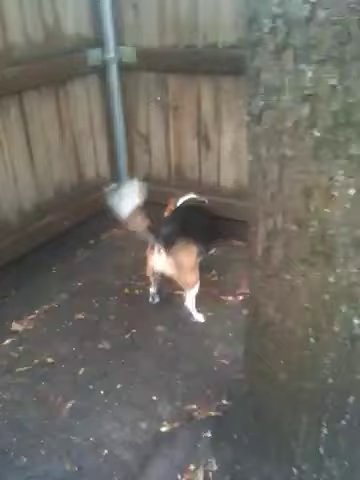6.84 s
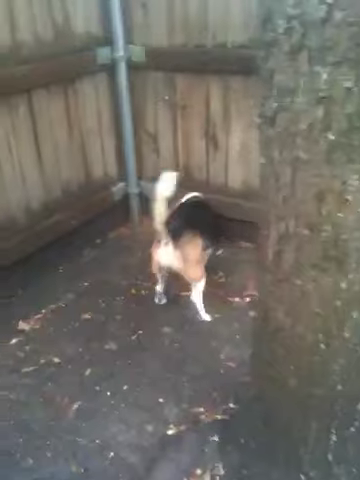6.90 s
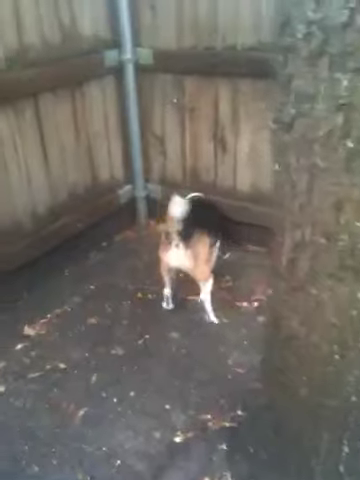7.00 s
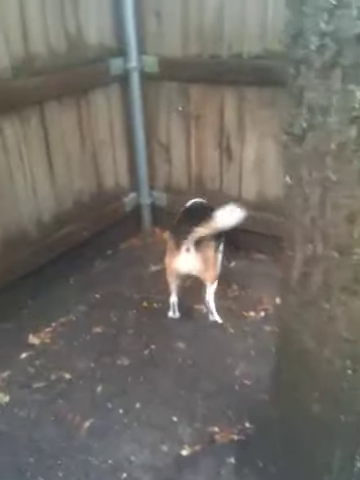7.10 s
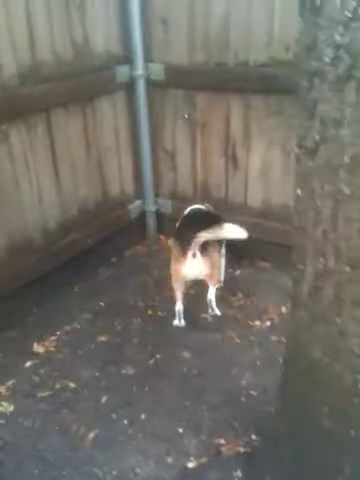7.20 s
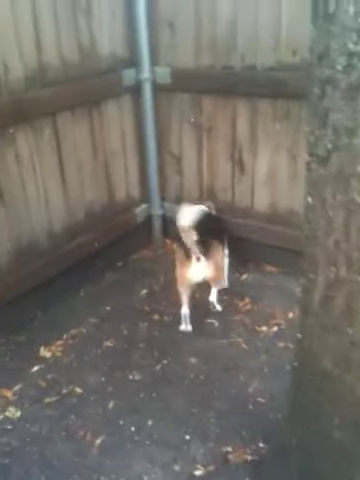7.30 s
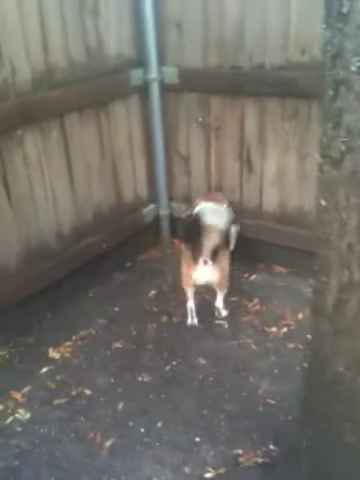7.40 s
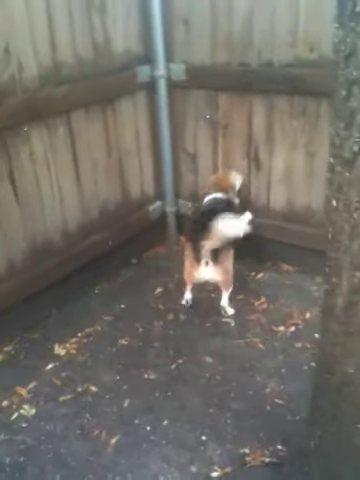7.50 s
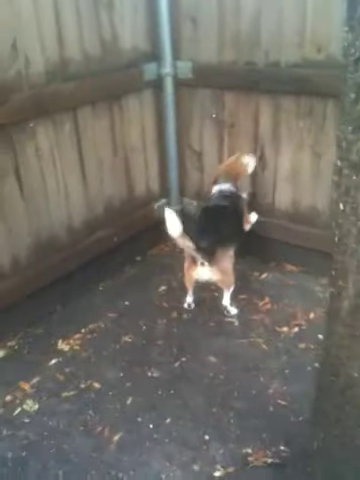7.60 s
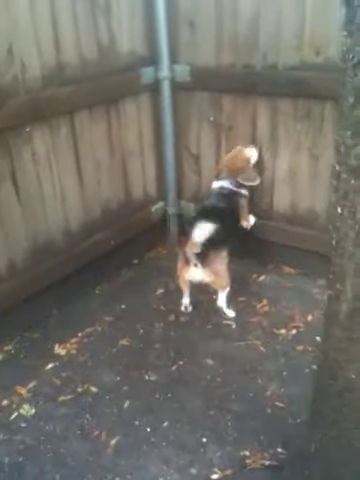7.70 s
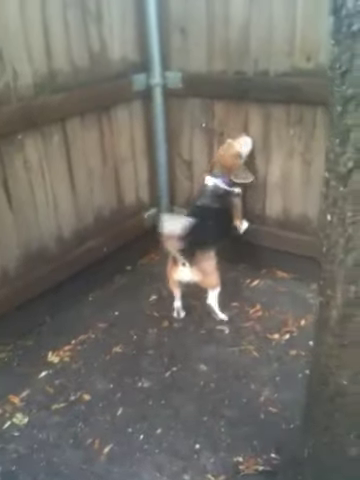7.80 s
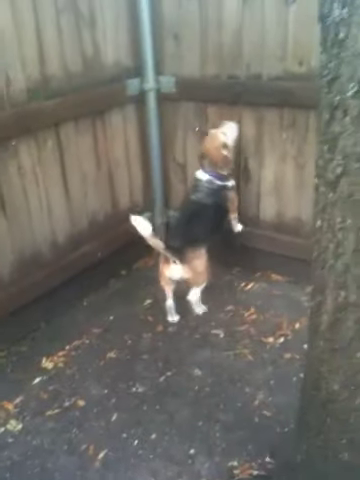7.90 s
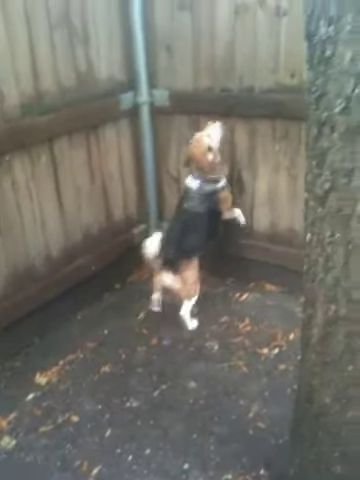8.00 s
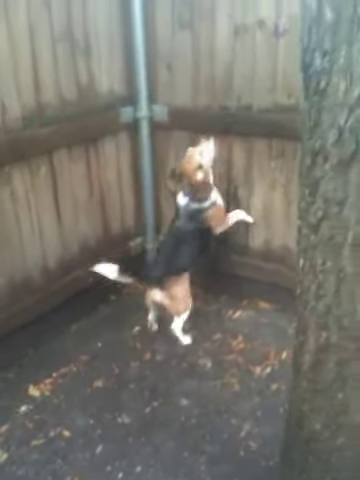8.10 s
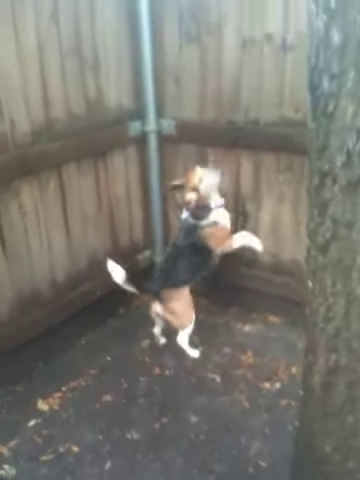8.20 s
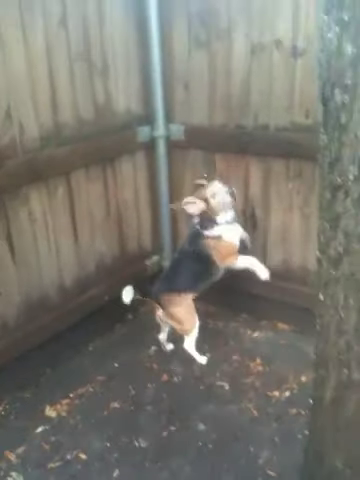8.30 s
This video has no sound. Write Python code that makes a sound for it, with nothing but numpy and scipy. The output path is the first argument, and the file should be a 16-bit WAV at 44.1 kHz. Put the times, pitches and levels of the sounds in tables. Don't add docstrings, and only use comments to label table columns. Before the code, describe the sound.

After a faint distant howl, a nearby dog bays twice with raspy voice and barks twice, paws rustling dry leaves over a soft outdoor hum.

```python
import sys
import numpy as np
from scipy import signal
from scipy.fft import rfft, irfft, next_fast_len
from scipy.io import wavfile
from scipy.ndimage import uniform_filter1d, map_coordinates

SR = 44100
rng = np.random.default_rng(int(sys.argv[2]) if len(sys.argv) > 2 else 0)


def dump(signal):
    limited = np.clip(np.atleast_2d(signal).T, -1, 1)
    pcm = np.round(limited * 32767).astype(np.int16)
    wavfile.write(sys.argv[1], SR, pcm)


def invert_db(x):
    u = np.asarray(x, float) / 20
    return 10 ** u


N = 368235
T = np.arange(N) / SR

# (frequency [Hz], level per Hz [dB])
AIR = [(18, -63), (30, -35), (86, -2.5), (189, -0.5), (233, -9.5), (303, -13), (449, -8.5), (632, -15),
       (1070, -19), (1460, -24), (2120, -27.5), (2900, -27), (6000, -29.5), (14800, -32), (16000, -41)]
AIR_DB = -61.5
# (time [s], level [dB])
LOW_DRONE = [(0.0, -55.5), (0.74, -50.5), (1.05, -57), (1.4, -75.5), (1.9, -63.5), (2.63, -58), (3.05, -66),
             (3.7, -71.5), (4.58, -75.5), (5.14, -65), (5.65, -69.5), (6.23, -63), (7.11, -74), (8.35, -92)]
HIGH_DRONE_DB, SPIN_DOWN_DB, SPIN_DOWN_S = -66.5, 7, 0.4

# (frequency [Hz], time to fall 60 dB [s])
YARD = [(300, 0.19), (800, 0.43), (2000, 0.58), (3600, 0.16), (5000, 0.013), (12000, 0.007)]
NEAR_ECHO_DB = -21.5

# (start [s], length [s], first pitch [Hz], last pitch [Hz], level [dB])
FAR_OPENING = [
    (0.0, .16, 1108, 1098, -53),
    (.08, .15, 1165, 1185, -60),
    (.03, .18, 1020, 1040, -63),
    (.17, .1, 1130, 1000, -60),
]
# (start [s], length [s], first pitch [Hz], last pitch [Hz], level [dB])
FAR_FALL = [
    (.205, .17, 985, 951, -54),
    (.4, .08, 965, 955, -65),
    (.29, .47, 835, 766, -53),
]

# (loudest time [s], build-up [s], rustle [dB], crackle over it [dB], thud over it [dB])
DRAGS = [(5.87, .06, -76.5, -4, 17), (6.043, 0.056, -59, -3, 5), (6.123, 0.029, -48.5, -11, -75),
         (6.176, 0.014, -58, -14, -21), (6.301, 0.1, -46.5, -4, -3), (6.599, 0.0607, -74, 11.5, -15),
         (7.53, .05, -68, 2.5, -13), (7.683, 0.053, -65, 3, -23)]
SETTLE = 0.76
# (time [s], peak level [dB], pitch [Hz], time to fall 60 dB [s])
SNAPS = [(0.152, -47, 6000, 0.023), (0.954, -44.5, 5000, 0.038), (1.1333, -40.5, 4440, 0.092),
         (1.4685, -39.5, 4370, 0.043), (3.302, -53, 8400, 0.03), (3.7933, -51.5, 8390, 0.04),
         (3.9728, -37.5, 7820, 0.025), (3.9843, -28.5, 7430, 0.025), (5.1514, -39.5, 2870, 0.093),
         (5.268, -40, 1500, .04), (8.162, -40, 2490, .03), (6.099, -53.5, 3305, 0.03),
         (6.163, -26.5, 3160, 0.039), (6.1694, -17, 3000, 0.041), (4.126, -18.5, 2300, .02),
         (5.372, -55.5, 9020, .02), (6.543, -46, 2705, 0.031), (7.138, -50, 9620, 0.024),
         (7.2426, -51, 5240, 0.028), (7.264, -51, 7960, 0.032), (7.3154, -46.5, 6080, 0.031),
         (7.5307, -49, 6200, 0.038), (7.6179, -37, 4000, 0.042), (7.666, -41, 6620, 0.03),
         (7.6839, -43, 6750, 0.0305), (7.891, -52, 11430, 0.037), (7.9819, -30.5, 3600, 0.064),
         (8.2755, -48.5, 2670, 0.029)]

# (time [s], peak level [dB], lowest ring [dB], highest ring [dB])
CLINKS = [(6.601, -45.5, -13, -29), (6.8069, -47, -10, -24.5), (6.825, -43, -13, -28),
          (6.925, -39.5, -4, -21), (6.9755, -47.5, -12, -9), (8.09, -43.5, -16.5, -30)]
# (frequency [Hz], level [dB], time to fall 60 dB [s])
TAG_RINGS = [(5780, 13, 0.081), (8400, 10, 0.096), (9730, 8, 0.03), (11670, 16, 0.16)]

# (middle [s], length [s], level [dB], brightness [dB],
# resonance [Hz])
PANTS = [(0.347, 0.045, -61.5, 1.5, 2120), (0.892, 0.069, -72, 7, 3040), (1.47, 0.047, -69, -0.5, 936),
         (2.144, 0.038, -48.5, -3.5, 3450), (2.25, 0.043, -64.5, -6, 3400), (2.45, 0.044, -60.5, -5, 3130),
         (3.457, 0.024, -61, 1.5, 870), (3.964, 0.067, -65.5, 6.5, 981), (5.3, 0.041, -54, -5.5, 783),
         (5.472, 0.051, -69.5, 1.5, 6440), (5.725, 0.035, -60, -5, 2920), (5.974, 0.055, -45, -32, 2502),
         (6.344, 0.063, -39.5, -7.5, 2693), (6.697, 0.029, -51.5, 2, 1250), (7.0, 0.029, -68, 0, 948),
         (7.2, 0.052, -74.5, 1, 800), (7.37, 0.054, -72.5, 1, 1820), (3.666, 0.048, -71, 0, 8180),
         (7.79, 0.012, -63.5, 1.5, 1220), (7.947, 0.022, -64.5, -20.5, 1765), (7.99, 0.014, -55, 3, 613),
         (8.192, 0.031, -54.5, 3.5, 1130), (8.35, 0.01, -43.5, -5, 492)]
# (frequency [Hz], level per Hz [dB])
BREATH = [(88, -50.5), (150, -11), (249, -4), (474, -15), (901, -1.5), (1010, -9), (1750, -10), (2250, -13),
          (3140, -11.5), (15800, -33.5)]
# (start [s], length [s], first pitch [Hz], last pitch [Hz], level [dB])
WHISTLE = [
    (0.835, 0.21, 4650, 4970, -53.5),
    (3.422, 0.064, 4670, 4600, -48),
    (3.4, 0.26, 4200, 4200, -70),
]
# (start [s], length [s], first pitch [Hz], last pitch [Hz], level [dB])
GRUNT = [
    (5.27, 0.1, 201, 156.5, -51),
]
# (start [s], length [s], first pitch [Hz], last pitch [Hz], level [dB])
WHINE = [
    (5.58, 0.23, 986, 991, -86),
]

# (time [s], pitch [Hz], effort [dB], brightness [dB], hoarseness [dB])
FIRST_CLIMB = [(1.568, 478.4, -31, -16, 6), (1.578, 487.5, -17.5, -15, -15),
               (1.599, 512.1, -9.5, -11.5, -25), (1.625, 523.4, -11.5, -10.5, -30),
               (1.639, 555.7, -9, -10.5, -29.5), (1.653, 581, -8, -14, -29.5), (1.667, 631, -10, -9.5, -29),
               (1.677, 606, -8.5, -12, -19), (1.686, 623.5, -13, -18.5, 1.5), (1.72, 640.6, -11.5, -24, -2),
               (1.755, 654, -10.5, -30, -8.5)]
# (time [s], pitch [Hz], effort [dB], brightness [dB], hoarseness [dB])
FIRST_HOLD = [(1.775, 675.3, -12.5, -35, -13), (1.81, 675.4, -13, -32, -13.5),
              (1.87, 686.3, -10.5, -34.5, -23), (1.91, 667.4, -14.5, -34, -14.5),
              (1.975, 688.6, -10, -47.5, -12), (2.01, 670.7, -13.5, -36, -15),
              (2.068, 661.4, -11.5, -27.5, -20.5)]
# (time [s], pitch [Hz], effort [dB], brightness [dB], hoarseness [dB])
FIRST_DROP = [(2.082, 581, -16.5, -25, -10), (2.102, 451, -15.5, -22.5, -8.5),
              (2.112, 412.6, -13, -17, -14), (2.13, 371.8, -19.5, -31, -16),
              (2.147, 333, -28.5, -38.5, -15.5)]
# (time [s], pitch [Hz], effort [dB], brightness [dB], hoarseness [dB])
SECOND_CLIMB = [(4.062, 523.8, -28, -17.5, -0.5), (4.071, 547.1, -10.5, -20.5, -14.5),
                (4.091, 606.7, -15, -6.5, -17), (4.1, 621.8, -15, -11.5, -22.5),
                (4.111, 639.5, -11.5, -6, -30.5), (4.122, 640.5, -11.5, -8, -19.5),
                (4.127, 648.3, -11, -24, -2.5), (4.15, 654.6, -13, -25, -5.5),
                (4.21, 645.6, -13.5, -24, -6), (4.256, 673, -14.5, -20.5, -11)]
# (time [s], pitch [Hz], effort [dB], brightness [dB], hoarseness [dB])
SECOND_HOLD = [(4.305, 667.2, -15.5, -25.5, -15.5), (4.325, 685, -10.5, -33.5, -19.5),
               (4.372, 662.5, -11, -30, -12), (4.39, 647.6, -16.5, -21, -6.5),
               (4.441, 631, -17, -30.5, -20.5), (4.484, 636, -14.5, -28.5, -24),
               (4.52, 628.5, -14.5, -25.5, -30)]
# (time [s], pitch [Hz], effort [dB], brightness [dB], hoarseness [dB])
DIP = [(4.546, 626.3, -13, -21, -29.5), (4.562, 564.7, -16.5, -16, -28), (4.58, 525.6, -13.5, -11.5, -26.5),
       (4.642, 480.3, -20, -9, -37), (4.654, 465.8, -10, -21.5, -44.5), (4.672, 458, -11.5, -19.5, -46),
       (4.688, 463, -12, -21, -43), (4.697, 486.1, -20.5, -11.5, -22), (4.711, 507.4, -10, -15.5, -33)]
# (time [s], pitch [Hz], effort [dB], brightness [dB], hoarseness [dB])
SLIDE = [(4.729, 540, -12, -11.5, -33), (4.76, 579.3, -7, -18, -28.5), (4.775, 593.7, -10, -15.5, -38.5),
         (4.816, 593, -8, -15.5, -44.5), (4.862, 566.2, -11.5, -10.5, -29.5),
         (4.89, 491, -14.5, -11.5, -13), (4.901, 457.7, -14, -9, -18), (4.918, 381.8, -23, -8, -5),
         (4.936, 313, -26, -9, 2.5), (5.001, 167.5, -38, -58.5, -15)]
# (time [s], pitch [Hz], effort [dB], brightness [dB], hoarseness [dB])
FIRST_BARK = [(5.752, 511.4, -29, -20.5, 4), (5.759, 513, -15, -15, -16), (5.786, 533.5, -10, -16, -27),
              (5.8, 540.8, -16.5, -11, -34.5), (5.822, 550.3, -15.5, -16.5, -39),
              (5.841, 542.6, -15, -15, -16.5), (5.87, 538.4, -24.5, -47, -5.5),
              (5.896, 531.5, -28, -38, -34), (5.945, 520, -39, -35, -25)]
# (time [s], pitch [Hz], effort [dB], brightness [dB], hoarseness [dB])
SECOND_BARK = [(6.168, 448, -48, -17, -9), (6.19, 463, -24.5, -6.5, -6), (6.207, 458.6, -25, -10.5, -9.5),
               (6.222, 470, -17.5, -4.5, -27.5), (6.24, 470.6, -15.5, -9, -26.5),
               (6.262, 447, -15, -9, -44), (6.279, 440.5, -22.5, -10.5, -17), (6.3, 440.7, -19, -20, -8),
               (6.322, 458.8, -27.5, -16, -7.5), (6.345, 460, -34.5, -7, -6.5)]
FIRST_BAY = FIRST_CLIMB + FIRST_HOLD + FIRST_DROP
SECOND_BAY = SECOND_CLIMB + SECOND_HOLD + DIP + SLIDE
CALLS = [FIRST_BAY, SECOND_BAY, FIRST_BARK, SECOND_BARK]

# (frequency [Hz], level [dB])
CHEST_AND_MOUTH = [(170, -14), (450, -18), (530, -25.5), (600, -2.5), (680, 0.5), (800, 1),
                   (930, 1.5), (1060, -12.5), (1190, -14.5), (1335, -18.5), (1420, -18.5), (1720, -15.5),
         (1930, -15.5), (2050, -20)]
# (frequency [Hz], level [dB])
THROAT = [(880, -38), (1500, -3), (2430, 1), (2900, -6.5), (3400, -19), (4100, -38), (4500, -33),
          (5100, -25.5), (5800, -29), (6570, -37), (7260, -37.5), (8410, -21.5), (9600, -29.5),
          (11100, -32.5), (12600, -30.5), (13500, -44), (15800, -58)]
# (frequency [Hz], width [Hz], level [dB])
RASP = [(813, 230, 12), (1300, 120, -16), (1635, 52, -3.5), (2102, 220, 6), (2482, 300, 1.5)]
# (from [s], resonance [Hz], lift [dB], second partial [dB], treble [dB])
JAW = [(0, 2024, 2, 2, -1.5), (1.645, 2290, 3, 3.5, 2.5), (1.672, 2023, 6, -10.5, 1.5),
       (1.705, 2004, 12, -4.5, 2), (1.74, 2032, 9, 0.5, 0), (1.775, 2020, 19.5, 4, -1.5),
       (1.802, 2044, 10, 6.5, -0.5), (1.817, 2040, 16.5, -0.5, 0.5), (1.85, 2042, -1.5, 2, 0.5),
       (1.9, 2020, 13, -0.5, 2.5), (1.93, 2030, 1, -2.5, 0), (1.99, 2040, 9.5, -3.5, -1),
       (2.04, 1994, 3, 1, 0), (2.062, 2460, 7, -14, 0.5), (2.092, 2500, 4, -5, 4),
       (4.0, 2966, -4.5, -2, -0.5), (4.08, 3084, -11, 13, 0.5), (4.097, 3100, -8.5, 2, 11.5),
       (4.107, 3150, -11.5, -15, 2), (4.118, 1960, 8.5, -8, -2.5), (4.26, 2038, 3, -9, -16.5),
       (4.315, 1985, -1.5, -1, -1.5), (4.36, 1913, 17, -2, 1), (4.42, 1920, 15, 8.5, 4.5),
       (4.494, 2570, 1.5, -0.5, -5), (4.555, 2150, 12, -2.5, 4), (4.7, 2053, 9, -0.5, 3),
       (4.736, 2234, 5.5, -13, 2), (4.756, 2310, 2.5, -0.5, 4), (4.86, 2440, 2, 3.5, 3),
       (5.7, 2126, 12.5, 4, 7), (5.83, 2180, 6, 7, -2), (6.1, 1386, 15, -5, 2.5),
       (6.198, 1410, 22, -3.5, 2), (6.255, 1350, 15, 0, 2), (6.27, 1330, 22, -1.5, 7.5),
       (6.29, 1338, 10.5, -3.5, 3.5)]
JAW_WIDTH_HZ = 120
JAW_ECHO = 0.5
# (from [s], resonance [Hz], lift [dB], third partial [dB], nasal band [dB])
TONGUE = [(0, 2116, 5, 7, 9), (1.64, 2450, 1.5, 4, 8), (1.7, 2700, 2.5, 0, -1),
          (2.05, 2484, 12.5, -3.5, -8.5), (4.0, 2500, 10, 0, 11), (4.085, 2503, 5, -0.5, 2),
          (4.14, 2660, 5.5, 0.5, -0.5), (4.4, 3820, 9.5, 0, 0.5), (4.55, 2500, 7, -2.5, -7.5),
          (4.72, 2925, 1, -0.5, -4.5), (4.86, 2345, 11, -1, -4), (5.7, 3220, 12.5, -5.5, 11.5),
          (6.1, 2799, 4.5, 0.5, 4), (6.245, 2650, -1.5, -0.5, 14.5), (6.29, 3050, 8, -2, 1.5)]
TONGUE_WIDTH_HZ, NASAL_HZ, NASAL_WIDTH_HZ = 160, 4800, 1100
THIRD_DB = -9
TREBLE_HZ, EDGE_DB, EDGE_FOLLOWS = 4182, -24.5, 0.12
# (strongest lump [s], lasts [s], lumps per second [Hz], depth [0-1])
CREAKS = [(1.693, 0.066, 79, 0.16), (1.787, 0.033, 78, 0.13), (4.127, .02, 110, 0.2),
          (4.373, 0.016, 96, 0.15), (5, 0.036, 90, 0.6), (4.88, .012, 60, .35), (4.9, 0.022, 90, 0),
          (5.8455, 0.038, 95, 0.7), (6.28, 0.029, 44.7, 0.97)]
THIRDS_DB, THIRDS_WANDER = -1.5, 0.75
# (frequency [Hz], level per Hz [dB])
HISS = [(1760, -33), (3000, -6.5), (3310, -1), (3830, -9.5), (4500, -20), (5200, -13.5), (5800, -12),
        (6600, -16.5), (7300, -10.5), (8500, -9.5), (10600, -15), (12600, -18), (15800, -26.5)]
HISS_DB, HISS_FOLLOWS_RASP, EXHALE_S = -41, 0.46, 0.0074
PUFF_DB, PUFF_S = -49, 0.2
LEAK_DB, LEAK_S = -40, 0.0072


def unit(x):
    return x / np.sqrt(np.mean(x ** 2) + 1e-20)


def along(points, hz):
    f, v = np.transpose(points)
    return np.interp(np.log(hz + 1), np.log(f + 1), v)


def curves(rows):
    s, *cols = np.transpose(rows)
    return [np.interp(T, s, c) for c in cols]


def steps(rows):
    starts, *cols = np.transpose(rows)
    row = np.searchsorted(starts, T, side="right") - 1
    return [uniform_filter1d(c[row], size=661) for c in cols]


def sounding(tables, fade):
    inside = sum((T >= rows[0][0]) & (T <= rows[-1][0] + 0.007) for rows in tables)
    return uniform_filter1d(np.minimum(inside, 1.), round(fade * SR))


def wobble(rate, t=T):
    coarse = T[::16]
    knots = rng.standard_normal(int(N * rate / SR) + 4)
    return np.interp(t, coarse, map_coordinates(knots, [coarse * rate]))


def bump(hz, centre, width):
    return np.exp(-((hz - centre) / width) ** 2)


def filtered(x, response):
    m = next_fast_len(N + SR // 2)
    return irfft(rfft(x, m) * response(np.fft.rfftfreq(m, 1 / SR)), m)[..., :N]


def resonant(modes):
    def response(f):
        return sum((-1) ** k * invert_db(db) * 1j * f * w / (c * c - f * f + 1j * f * w)
                   for k, (c, w, db) in enumerate(modes))
    return response


def noise(spectrum):
    return unit(filtered(rng.standard_normal(N), lambda hz: invert_db(along(spectrum, hz))))


def patchy(x, depth_db):
    z = signal.stft(x, nperseg=512)[2]
    field = uniform_filter1d(rng.standard_normal(z.shape), size=5, axis=0)
    field = uniform_filter1d(field, size=10, axis=1)
    return unit(signal.istft(z * invert_db(depth_db * unit(field)), nperseg=512)[1][:N])


def background():
    low_db, = curves(LOW_DRONE)
    low = np.sin(2 * np.pi * 200.5 * T + 0.7 * wobble(9)) * invert_db(1.5 * wobble(11))
    high_db = HIGH_DRONE_DB + SPIN_DOWN_DB * np.exp(-T / SPIN_DOWN_S) + 1.3 * wobble(1.0)
    high = unit(filtered(rng.standard_normal(N), resonant([(238.1, 6.1, 0)])))
    air = invert_db(AIR_DB + 0.8 * wobble(3)) * noise(AIR)
    return air + invert_db(low_db + 3.5) * low + invert_db(high_db + 0.5) * high


def yard(x):
    hz, t, z = signal.stft(rng.standard_normal(SR), SR, nperseg=256)
    hz = hz[:, None]
    boards = invert_db(-60 * t / along(YARD, hz))
    scattered = invert_db(-12.5 - 57 * t) / (1 + (hz / 800) ** 4)
    tail = signal.istft(z * (boards + scattered), SR, nperseg=256)[1]
    delayed = np.pad(x, (600, 0))
    return signal.fftconvolve(delayed, tail / np.linalg.norm(tail))[:N]


def tone(notes, overtones_db, unsteady_db, fade, glide_s, sag_db, wander):
    out = np.zeros(N)
    for s, length, first_hz, last_hz, db in notes:
        on = sounding([[(s,), (s + length,)]], fade)
        live = on > 0
        t = np.clip(T[live] - s, 0, length)
        hz = last_hz + (first_hz - last_hz) * np.exp(-t / glide_s)
        hz = hz * (1 + wander * wobble(30, T[live]))
        phase = 2 * np.pi * np.cumsum(hz) / SR
        wave = sum(invert_db(o) * np.sin(k * phase) for k, o in enumerate(overtones_db, 1))
        level_db = db - sag_db * (t / length) ** 2 + unsteady_db * wobble(45, T[live])
        out[live] += np.sqrt(2) * on[live] * invert_db(level_db) * wave
    return out


def far_howl():
    return tone(FAR_OPENING + FAR_FALL, [0, -30, -29], unsteady_db=3.5, fade=0.033, glide_s=0.069,
                sag_db=24.5, wander=0.016)


def leaves():
    s, build, db, crackle_db, thud_db = np.transpose(DRAGS)[:, :, None]
    stroke = invert_db(db) * np.exp(-np.abs(T - s) / np.where(T < s, build, SETTLE * build))
    grains = rng.standard_normal((2, N)) * invert_db(4.4 * np.array([wobble(320), wobble(300)]))
    rustle_colour = [(200, -21.5), (800, 14.5), (3000, 14.0), (7000, 14.5), (9000, -33.0)]
    crackle_colour = [(5000, -21.5), (7500, 5.5), (12000, -3.0), (15800, -11.5)]
    rustle = unit(filtered(grains[0], lambda f: invert_db(along(rustle_colour, f))))
    crackle = unit(filtered(grains[1], lambda f: invert_db(along(crackle_colour, f))))
    thud = noise([(120, -27.0), (300, -1.5), (900, 1.5), (1600, -30.0)])
    out = invert_db(2) * rustle * stroke.sum(axis=0)
    out += invert_db(crackle_db[:, 0] - 1.0) @ stroke * crackle
    out += invert_db(thud_db[:, 0] + 8.5) @ stroke * thud
    out = np.pad(out, (0, SR))
    t = np.arange(SR // 8) / SR
    for s, db, hz, t60 in SNAPS:
        fading = invert_db(-60 * t / 0.008) + 0.33 * invert_db(-60 * t / t60)
        burst = rng.standard_normal(len(t)) * fading
        b, a = signal.butter(2, [hz / 7.2, min(hz * 2.0, 20000)], "bandpass", fs=SR)
        out[round(s * SR):][:len(t)] += invert_db(db - 5.5) * signal.lfilter(b, a, burst)
    return out[:N]


def tags():
    out = np.zeros(N + SR)
    t = np.arange(SR // 3) / SR
    for s, db, low_db, high_db in CLINKS:
        strengths = [low_db, *rng.normal(0, 2.3, size=2), high_db]
        ring = sum(invert_db(level + own - 60 * t / t60) * np.sin(2 * np.pi * hz * t)
                   for (hz, level, t60), own in zip(TAG_RINGS, strengths))
        out[round(s * SR):][:len(t)] += invert_db(db - 17.0) * ring * (1 - np.exp(-t / 0.000083))
    return out[:N]


def panting():
    air = noise(BREATH) * invert_db(2.5 * wobble(60))
    out = np.zeros(N)
    for s, length, db, tilt_db, hz in PANTS:
        near = np.abs(T - s) < 3 * length
        dark = signal.lfilter(*signal.butter(4, 3700, fs=SR), air[near])
        bright = air[near] - dark
        mouth = unit(signal.lfilter(*signal.iirpeak(hz, 4, fs=SR), air[near]))
        puff = invert_db(db) * bump(T[near], s, length)
        out[near] += puff * (dark + invert_db(tilt_db) * bright + 0.93 * mouth)
    return out


def nose_and_sighs():
    whistle = tone(WHISTLE, [0, -30], unsteady_db=5.0, fade=0.021, glide_s=0.028, sag_db=37, wander=0.0027)
    grunt = tone(GRUNT, [0, -20], unsteady_db=10.5, fade=0.034, glide_s=0.062, sag_db=23, wander=0.01)
    whine = tone(WHINE, [0, 4, 0], unsteady_db=3, fade=0.04, glide_s=0.066, sag_db=-12, wander=0.02)
    return whistle + grunt + whine


def creak():
    gain = np.ones(N)
    for s, lasts, rate, depth in CREAKS:
        near = (T > s - 1 / rate) & (T < s + lasts)
        cycles = rate * (T[near] - s)
        grip = np.clip(2 * np.minimum(cycles + 1, rate * lasts - cycles), 0, 1) * np.clip(depth, 0, 1)
        gain[near] += grip * np.cos(2 * np.pi * cycles + 0.3 * wobble(40, T[near]))
    return gain


def jaw_lift(hz, jaw_hz, jaw_db):
    direct = bump(hz, jaw_hz, JAW_WIDTH_HZ)
    octave = bump(hz / 2, jaw_hz, JAW_WIDTH_HZ)
    return jaw_db * (direct + JAW_ECHO * octave)


def low_partial_levels(pitch, effort_db, jaw, third_db):
    jaw_hz, jaw_db, second_db, _ = jaw
    own_db = {1: 0, 2: second_db, 3: THIRD_DB + third_db}
    levels = []
    for k in (1, 2, 3):
        passed = along(CHEST_AND_MOUTH, k * pitch) + jaw_lift(k * pitch, jaw_hz, jaw_db)
        levels.append(effort_db + passed + own_db[k] + 1.5 * (k - 1) * wobble(32))
    return levels


def upper_partials(pitch, phase, bright_db, live, jaw, tongue):
    jaw_hz, jaw_db, _, treble_db = [c[live] for c in jaw]
    tongue_hz, tongue_db, _, nasal_db = [c[live] for c in tongue]
    pitch, phase, t = pitch[live], phase[live], T[live]
    gains = []
    for k in range(4, 28):
        hz = k * pitch
        level_db = along(THROAT, hz) + jaw_lift(hz, jaw_hz, jaw_db)
        level_db += tongue_db * bump(hz, tongue_hz, TONGUE_WIDTH_HZ)
        level_db += nasal_db * bump(hz, NASAL_HZ, NASAL_WIDTH_HZ)
        gains.append(invert_db(level_db + 5.2 * wobble(30, t)))
    shake = 0.006 * wobble(250, t)
    edge = invert_db((EDGE_FOLLOWS - 0.5) * (bright_db[live] - EDGE_DB) + treble_db)
    total = 0
    for k, gain in enumerate(gains, 4):
        in_treble = np.clip((k * pitch - TREBLE_HZ) / 300, 0, 1)
        total = total + gain * edge ** in_treble * np.cos(k * phase + k * k * (1 + shake))
    out = np.zeros(N)
    out[live] = total / np.linalg.norm(gains, axis=0)
    return out


def third_lines(pitch, phase, live):
    t = T[live]
    drift = THIRDS_WANDER * wobble(60, t)
    lines = [j for j in range(4, 14) if j % 3]
    mouth = resonant(RASP)
    gains = [np.abs(mouth(j * pitch[live] / 3)) ** 2 * invert_db(3.5 * wobble(40, t)) for j in lines]
    total = sum(g * np.cos(j * phase[live] / 3 + drift + j * j) for j, g in zip(lines, gains))
    out = np.zeros(N)
    out[live] = total / np.linalg.norm(gains, axis=0)
    return out


def teeth_hiss(on, rasp_db, phase):
    hiss = patchy(noise(HISS), depth_db=3) * (1 + 0.5 * np.cos(phase))
    flow = on * invert_db(HISS_DB + HISS_FOLLOWS_RASP * rasp_db)
    flow += on * invert_db(PUFF_DB) * sum(np.exp(-np.abs(T - rows[0][0]) / PUFF_S) for rows in CALLS[:2])
    keep = np.exp(-1 / (EXHALE_S * SR))
    return np.maximum(flow, signal.lfilter([1 - keep], [1, -keep], flow)) * hiss


def voice():
    pitch, effort_db, bright_db, hoarse_db = curves(sum(map(list, CALLS), []))
    pitch = uniform_filter1d(pitch, size=441) * (1 + 0.0025 * wobble(22))
    jaw, tongue = steps(JAW), steps(TONGUE)
    on = sounding(CALLS, fade=0.0016)
    live = on > 0

    low_db = low_partial_levels(pitch, effort_db, jaw, third_db=tongue[2])
    rasp_db = effort_db + hoarse_db
    tone_size = np.linalg.norm(invert_db(np.array(low_db)), axis=0)
    rough = np.clip(invert_db(rasp_db) / tone_size, 0.02, 0.5)

    phase = 2 * np.pi * np.cumsum(pitch * (1 + 0.0025 * wobble(60))) / SR
    slip = 0.65 * rough * wobble(220)
    clean = sum(invert_db(db + 1.3 * k * wobble(90)) * np.cos(k * phase + (k - 0.8) * slip + k)
                for k, db in enumerate(low_db, 1))
    upper = upper_partials(pitch, phase + slip, bright_db, live, jaw, tongue)
    clean += invert_db(effort_db + bright_db - 1.0) * upper

    flutter = 1 + 0.29 * np.sin(2 * np.pi * np.cumsum(85 + 20 * wobble(25)) / SR)
    mouth = resonant(RASP)
    rasp = unit(filtered(flutter * rng.standard_normal(N),
                         lambda f: mouth(f) ** 2 / (1 + (700 / (f + 1)) ** 8)))
    thirds = third_lines(pitch, phase, live)
    hoarse = invert_db(rasp_db) * (0.84 * rasp + invert_db(THIRDS_DB) * thirds)
    fluttered = np.sqrt(2) * clean * (1 + rough * (flutter - 1))

    leak = sum(np.exp(-np.abs(T - rows[0][0]) / LEAK_S) * (T < rows[0][0]) for rows in CALLS[:3])
    called = on * creak() * (fluttered + hoarse)
    return called + teeth_hiss(on, rasp_db, phase) + invert_db(LEAK_DB) * leak * rasp


def scene():
    far = far_howl()
    near = leaves() + tags() + panting() + nose_and_sighs() + voice()
    echo = yard(invert_db(NEAR_ECHO_DB) * near + invert_db(-2.5) * far)
    return (background() + echo + invert_db(-7.5) * far + near)[None]


def masked(x, below_db):
    hz, _, z = signal.stft(x, SR, nperseg=1536)
    hz = hz[:, None]
    size = np.abs(z)
    floor = invert_db(below_db - 9 * (hz > 11500)) * size.max(axis=1, keepdims=True)
    weak = (size < floor) & (hz > 3300)
    return signal.istft(z * ~weak, SR, nperseg=1536)[1][:, :N]


def band_limit(x):
    return signal.sosfilt(signal.butter(12, 16630, fs=SR, output="sos"), x)


def record(dry):
    overloaded = dry / (1 + np.abs(dry / 0.69) ** 12) ** (1 / 12)
    heard = filtered(overloaded, lambda f: (f < 15800) / (1 + (80 / (f + 1)) ** 2))
    mix = masked(heard, below_db=-60)
    return band_limit(mix)


dry = scene()
out = record(dry)
dump(out)
```